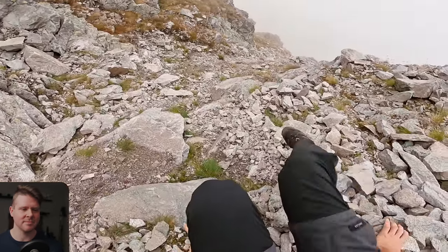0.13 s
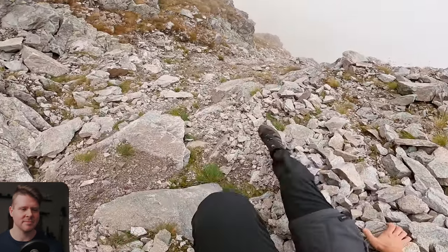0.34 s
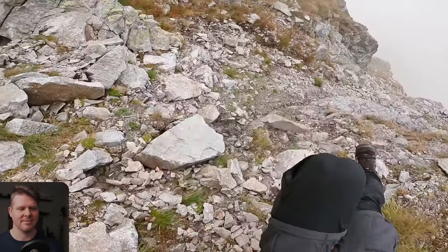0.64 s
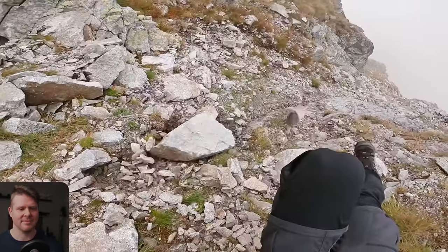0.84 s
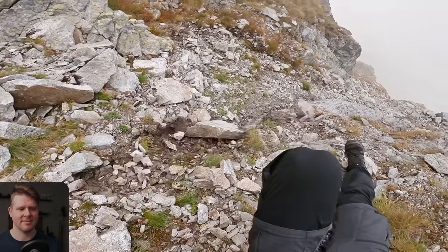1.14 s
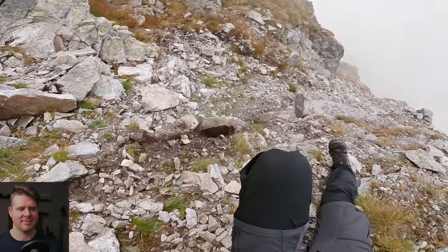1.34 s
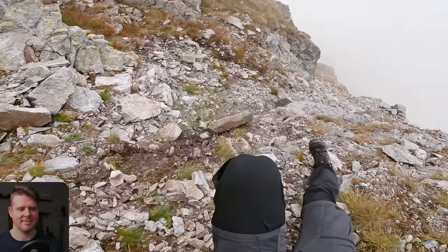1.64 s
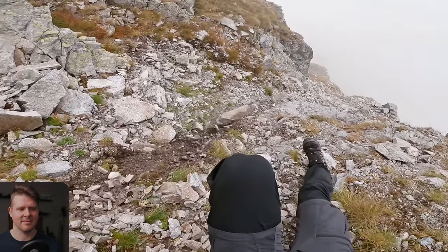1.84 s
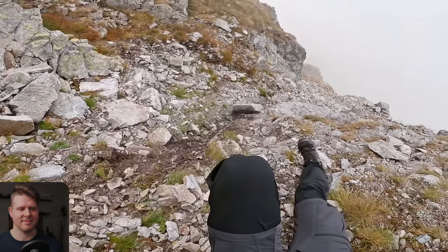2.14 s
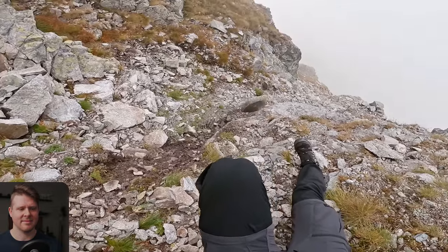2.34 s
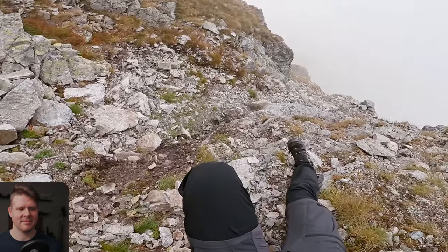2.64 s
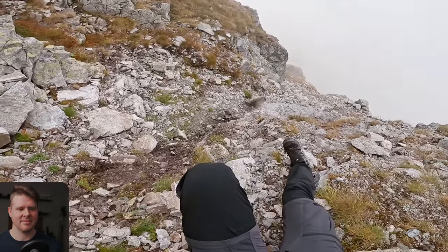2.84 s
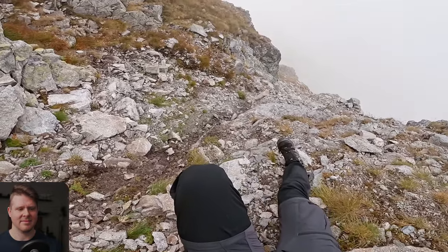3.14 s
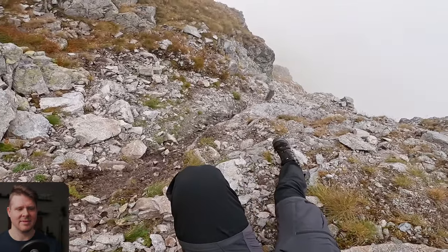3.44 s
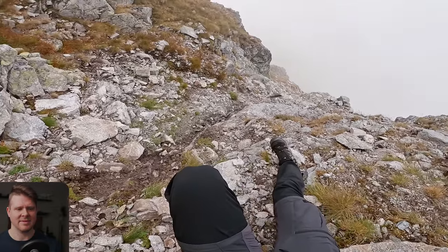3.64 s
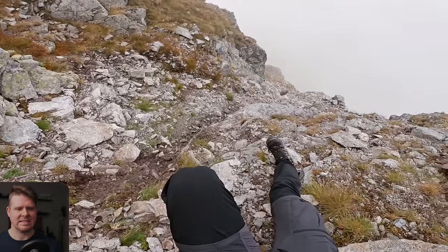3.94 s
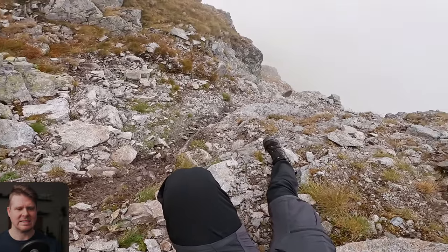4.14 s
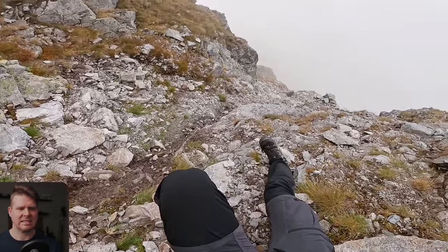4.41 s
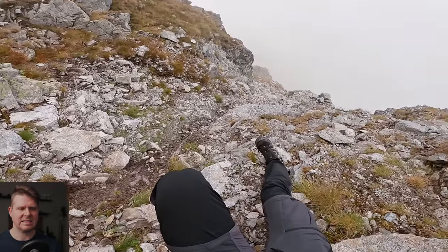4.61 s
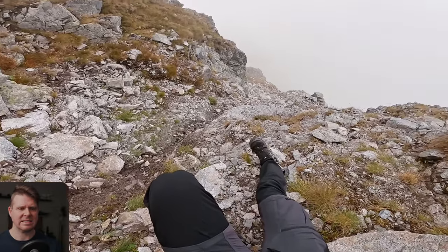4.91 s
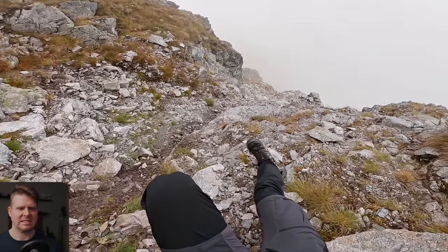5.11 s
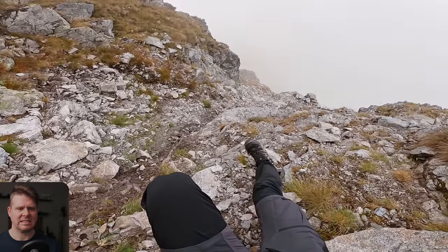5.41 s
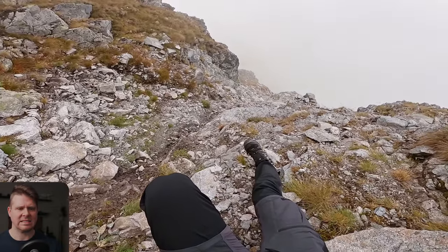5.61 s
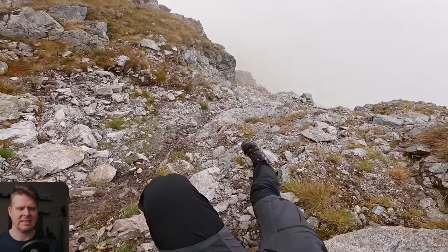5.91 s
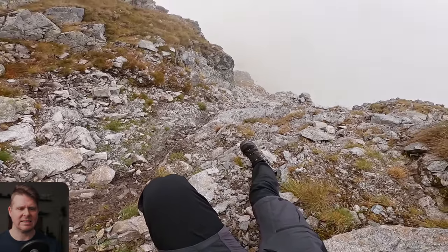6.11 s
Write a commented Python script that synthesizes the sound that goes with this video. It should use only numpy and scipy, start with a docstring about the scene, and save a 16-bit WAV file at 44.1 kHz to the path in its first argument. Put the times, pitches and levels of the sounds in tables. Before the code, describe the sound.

A dry slide of gravel and rocks pours down a mountainside, slabs scraping at first, then stones tumbling, snapping and thumping into soil.

```python
"""Loose stones on a scree slope

Loose stones slide close below a camera worn by a person on the slope, in open air with no echo.
Gravel, chips, tumbling stones and soil are crowds of tiny decaying rings and grit noise, shaped by surges.
Slabs grind in stick-slip rings; flicks, snaps, clacks and thuds are single blows that chatter as they settle.
A low shudder and a faint air rumble lie below; gain control and a fast limiter hold the loud knocks down.
"""
import sys
import numpy as np
from scipy import signal
from scipy.fft import rfft, irfft, next_fast_len
from scipy.io import wavfile
from scipy.ndimage import uniform_filter1d, minimum_filter1d

SR = 44100
rng = np.random.default_rng(int(sys.argv[2]) if len(sys.argv) > 2 else 0)


def int16_out(signal):
    """Quantize to a 16-bit WAV file."""
    q = np.round(np.clip(np.atleast_2d(signal).T, -1, 1) * 32767)
    wavfile.write(sys.argv[1], SR, q.astype(np.int16))


N = 276110
TIME = np.arange(N) / SR  # s

# how far the arrival at the two microphone ports scatters: frequency_hz, lead_scatter_rad
PORT_SCATTER = [(100, .2), (400, .3), (1000, .47), (2000, .6), (4000, .8), (8000, 1.35)]


def amp(db):
    """Decibels to gain."""
    return 10 ** (np.asarray(db) / 20)


def read(points, hz):
    """Reads a frequency table on a logarithmic frequency axis."""
    table_hz, value = np.transpose(points)
    return np.interp(np.log(hz + 1), np.log(table_hz + 1), value)


def add(mix, s, sound):
    """Mixes a sound in at time s."""
    part = mix[:, max(round(s * SR), 0):][:, :sound.shape[1]]
    part += sound[:, :part.shape[1]]


def dulled(x, hz, order):
    """A low-pass: soil and rough faces soften the attack of a blow."""
    return signal.sosfilt(signal.butter(order, hz, fs=SR, output="sos"), x)


def thinned(x, hz, order):
    """A high-pass takes away the bass."""
    return signal.sosfilt(signal.butter(order, hz, "high", fs=SR, output="sos"), x)


def contacts(at, gain, hz, cycles, length, size):
    """Each contact rings for a few cycles and reaches one port sooner, by a random lead."""
    turns = hz.astype(np.float32)[:, None] * np.arange(size, dtype=np.float32) / SR
    push = (gain * np.sign(rng.standard_normal(len(hz))))[:, None]
    lead_rad = read(PORT_SCATTER, hz) * rng.standard_normal(len(hz))
    lead = (lead_rad / (2 * np.pi)).astype(np.float32)[:, None]  # in cycles
    where = ((at * SR).astype(int)[:, None] + np.arange(size)).ravel()
    ports = []
    for side in (1, -1):
        arrived = np.maximum(turns - np.maximum(side * lead, 0), 0)
        attack = np.minimum(2 * arrived, 1)  # half a cycle
        ring = push * np.exp(-arrived / cycles) * attack * np.sin(2 * np.pi * arrived)
        ports.append(np.bincount(where, ring.ravel(), length)[:length])
    return np.array(ports)


def spills(per_s, lo_hz, hi_hz, cycles, spread_db, spill_s, wander, count, size):
    """Stones topple at random, each rattling a few times near its own pitch."""
    toppling = int(per_s * N / SR)
    start, kind, weight = rng.random((toppling, 3)).T[:, :, None]
    at = start * N / SR + spill_s * rng.exponential(1, (toppling, count))
    own_hz = lo_hz * (hi_hz / lo_hz) ** kind
    hz = np.minimum(own_hz * np.exp(wander * rng.standard_normal((toppling, count))), SR / 3)
    scatter = 2 * weight ** 2 + rng.standard_normal((toppling, count)).clip(-2, 2)
    gain = hz * amp(spread_db * scatter)  # higher rings start louder
    stream = contacts(at.ravel(), gain.ravel(), hz.ravel(), cycles, N, size)
    return stream / stream.std()


def grit():
    """Countless crushed grains merge into a hiss; the higher it is, the less alike the two ports hear it."""
    size = next_fast_len(N)
    common, apart = rfft(rng.standard_normal((2, size)))
    alike = np.exp(-read(PORT_SCATTER, np.fft.rfftfreq(size, 1 / SR)) ** 2 / 2)
    side = np.array([[1], [-1]])
    both = common * np.sqrt((1 + alike) / 2) + side * apart * np.sqrt((1 - alike) / 2)
    return irfft(both, size)[:, :N]


def ticks():
    """Sharp edges crumble in short bursts of dry ticks, each too brief to hold a note."""
    return spills(per_s=150, lo_hz=5000, hi_hz=9000, cycles=.35, spread_db=2.3,
                  spill_s=.0015, wander=.1, count=9, size=24)


def jerks(per_s, swing_db, fall_s):
    """The heap slips in jerks: a sudden rise in level that dies away, bounded by the swing."""
    kicks = (rng.random(N) < per_s / SR) * rng.uniform(0.1, 1, N)
    push = signal.lfilter([1], [1, -np.exp(-1 / (fall_s * SR))], kicks)
    return amp(swing_db * np.tanh((push - push.mean()) / push.std() / 2))


def coloured(x, spectrum, band, steady_s):
    """Filters a stream by a spectrum and evens its level in a band (Hz) over spans longer than steady_s."""
    size = next_fast_len(N + 4096)
    hz = np.fft.rfftfreq(size, 1 / SR)
    z = rfft(x, size) * amp(read(spectrum, hz))
    inside = irfft(z.mean(0) * (hz > band[0]) * (hz < band[1]), size)[:N]
    span = max(int(steady_s * SR), 2)
    power = uniform_filter1d(uniform_filter1d(inside ** 2, span), span)
    floor = 0.0067 * power.mean()  # keeps near-silent spots from being blown up
    return irfft(z, size)[:, :N] / np.sqrt(abs(power) + floor)


def flow(surges, steady_db, share, waver_db, waver_s):
    """Gain of one layer: a wavering trickle that follows the slide by a share, with its surges on top."""
    # how hard the slope runs: time_s, relative_level_db
    slide_level = [(0.0, -2), (0.44, -3.5), (0.52, -2), (0.87, -0.5), (1.5, 0.5), (2.68, 0.5), (2.75, 0),
                   (2.92, 0.5), (3.02, 0.5), (3.3, -0.1), (3.74, .5), (3.8, -0.5), (4.15, 0.07), (4.6, 0),
                   (5.8, 0), (6.05, -1), (6.26, -2)]
    # loose ground gives way quickly, runs for a while and jams again
    rise_s, fall_s = 0.0048, 0.0059
    slide = amp(np.interp(TIME, *np.transpose(slide_level)))
    power = (amp(steady_db) * slide ** share) ** 2
    for start, length, db in surges:
        first = int(start * SR)
        age = TIME[:N - first][:SR]
        rise = np.minimum(age / rise_s, 1)
        fall = np.exp(-np.maximum(age - length, 0) / fall_s)
        power[first:first + len(age)] += (amp(db) * rise * fall) ** 2
    span = max(int(waver_s * SR), 2)
    waver = uniform_filter1d(uniform_filter1d(rng.standard_normal(N), span), span)
    return np.sqrt(power) * amp(waver_db * waver / waver.std())


def blows(rows, cycles, chatter_db, pitch_spread, count, size):
    """A stone strikes, then chatters more softly as it settles, each contact at another pitch."""
    out = np.zeros((2, N))
    for s, db, hz, settle_s in rows:
        delay = np.r_[0, rng.exponential(1, count)]  # in settling times
        gain = np.r_[1, amp(chatter_db) * np.exp(-delay[1:] / 2)]
        scatter = np.r_[0, rng.standard_normal(count)]
        pitch = np.minimum(hz * np.exp(pitch_spread * scatter), SR / 3)
        blow = contacts(delay * settle_s, gain, pitch, cycles, SR // 5, size)
        add(out, s, amp(db) * blow / abs(blow).max())
    return out


def air():
    """A faint, even rumble of moving mountain air, which also brushes each port on its own."""
    # rumble filter: frequency_hz, relative_level_db
    rumble = [(15, -6), (40, -3), (80, 0), (130, -3), (300, -18), (1000, -50)]
    brush = dulled(rng.standard_normal((2, N)), hz=45, order=1)
    return amp(-60) * coloured(grit() + .7 * brush, rumble, band=(25, 130), steady_s=.3)


def ground():
    """Low-filtered noise: the slope shudders briefly under heavy blocks, over a far fainter rumble."""
    # shudders: start_s, length_s, relative_level_db
    shudders = [(0.96, 0.086, -46), (1.228, 0.024, -40), (1.672, 0.014, -38), (2.255, 0.059, -40),
                (2.8, 0.064, -42), (2.94, .025, -39), (3.99, 0.025, -38.5), (4.294, 0.021, -33),
                (4.485, 0.016, -33), (5.16, 0.026, -32), (5.203, .055, -31), (5.29, 0.063, -40),
                (6.05, 0.064, -37)]
    # filter of the shaking slope: frequency_hz, relative_level_db
    spectrum = [(20, -15), (45, -5.5), (75, 7.5), (125, 6), (180, -18), (400, -54)]
    level = flow(shudders, steady_db=-60.5, share=0.7, waver_db=1.2, waver_s=0.018)
    return level * coloured(grit(), spectrum, band=(40, 140), steady_s=0.018)


def earth(slip, dry_ticks):
    """Soil slumps under the stones: dull bumps, crumbling ticks and grit through a low filter."""
    # slumps of soil: start_s, length_s, relative_level_db
    slumps = [(0.96, 0.13, -37.5), (1.28, 0.11, -36.5), (2.39, 0.15, -37), (3.0, .09, -34),
              (3.18, 0.25, -38.5), (3.55, 0.15, -36.5), (3.81, 0.27, -41), (4.33, .1, -38.5),
              (4.82, 0.227, -35.5), (5.17, 0.12, -34.5), (5.47, 0.26, -38.5), (6.01, .19, -34)]
    # filter of the soil: frequency_hz, relative_level_db
    spectrum = [(20, -34), (50, -26), (75, -14), (120, -9), (170, -2), (340, 0), (460, -2), (700, -2),
                (1100, -13), (2500, -45)]
    bumps = spills(per_s=70, lo_hz=76.7, hi_hz=836, cycles=2.75, spread_db=2.0,
                   spill_s=.008, wander=0.19, count=3, size=1800)
    stream = (.8 * bumps + 2.5 * dry_ticks + 2.2 * grit()) * slip
    level = flow(slumps, steady_db=-43.5, share=0.99, waver_db=1.5, waver_s=0.033)
    return level * coloured(stream, spectrum, band=(200, 750), steady_s=0.081)


def stones(slip, dry_ticks):
    """Hand-sized stones tumble over each other; short, damped rings give a dry, hollow rattle."""
    # tumbles: start_s, length_s, relative_level_db
    tumbles = [(0.0, 0.21, -26), (0.55, 0.12, -25.5), (0.93, 0.14, -24.5), (1.21, 0.2, -25),
               (1.6, 0.086, -22), (1.84, 0.087, -23), (2.36, 0.27, -25.5), (3.18, 0.12, -25),
               (3.55, 0.12, -23.5), (3.86, 0.18, -22.5), (4.13, 0.28, -25), (4.34, 0.26, -30.5),
               (4.76, 0.25, -29), (5.17, 0.12, -25), (5.37, 0.22, -44), (5.63, 0.11, -28), (6.0, 0.22, -25)]
    # filter of hand-sized stones: frequency_hz, relative_level_db
    spectrum = [(80, -49), (300, -15.5), (600, -9.5), (780, -7), (950, 0), (1300, 0), (1800, -2),
                (2400, -4), (3500, -4.5), (7000, -83)]
    rattle = spills(per_s=190, lo_hz=850, hi_hz=2300, cycles=1.8, spread_db=3.0,
                    spill_s=.004, wander=.22, count=3, size=400)
    stream = (rattle + 2.0 * dry_ticks + 1.4 * grit()) * slip
    level = flow(tumbles, steady_db=-26.0, share=0.43, waver_db=2.0, waver_s=0.043)
    return level * coloured(stream, spectrum, band=(900, 2400), steady_s=0.012)


def gravel(slip, dry_ticks):
    """Pebbles clatter, some rock to rest on their own note, flat ones clink; fine chips tinkle in grit."""
    # gravel pouring away: start_s, length_s, relative_level_db
    pours = [(0.0, 0.15, -24), (0.2, 0.18, -34), (0.525, 0.053, -21), (0.95, 0.13, -27), (1.21, 0.075, -24),
             (1.42, 0.14, -28), (1.61, 0.11, -28), (1.82, 0.075, -23.5), (1.95, 0.025, -22),
             (2.335, 0.05, -23), (2.425, 0.11, -26.5), (2.57, 0.086, -30), (2.66, 0.036, -23),
             (2.81, 0.051, -21.5), (2.985, 0.2, -24), (3.43, 0.062, -20.5), (3.54, 0.15, -22.5),
             (3.84, 0.12, -21.5), (4.01, 0.063, -23.5), (4.13, 0.1, -22.5), (4.38, .06, -27),
             (4.55, .16, -19), (4.755, 0.14, -20.5), (5.17, 0.067, -33), (5.3, 0.12, -33),
             (5.41, 0.05, -20.5), (5.62, 0.1, -26.5), (5.765, 0.04, -22.5), (5.96, 0.13, -31),
             (6.158, 0.12, -26)]
    # sprays of fine chips: start_s, length_s, relative_level_db
    sprays = [(0.52, 0.18, -38), (0.925, 0.1, -35.5), (1.09, 0.076, -35), (1.45, 0.075, -33),
              (1.62, 0.19, -32), (1.9, 0.12, -32.5), (2.07, 0.042, -37), (2.2, 0.26, -50),
              (2.53, 0.12, -37), (3.53, .06, -40), (3.69, 0.049, -37), (4.005, 0.034, -39),
              (4.375, 0.076, -39), (4.68, 0.21, -43), (4.96, 0.057, -49)]
    # filters of gravel and of chips: frequency_hz, relative_level_db
    gravel_spectrum = [(200, -55), (900, -30), (1700, -3), (2400, -1), (3400, 1), (4200, -1), (5200, -4),
                       (6200, -12), (7200, -17), (9000, -21.5), (14000, -49)]
    chip_spectrum = [(500, -19), (3500, 4.5), (5500, 5), (6500, 1), (8000, -7.5), (10000, -17.5),
                     (12400, -24.5), (14800, -42)]
    pebbles = spills(per_s=170, lo_hz=1900, hi_hz=6500, cycles=4, spread_db=2.8,
                     spill_s=.002, wander=.17, count=6, size=360)
    rocking = spills(per_s=55, lo_hz=2000, hi_hz=6500, cycles=7, spread_db=2.2,
                     spill_s=.007, wander=.045, count=10, size=600)
    clinks = spills(per_s=60, lo_hz=2400, hi_hz=6500, cycles=22, spread_db=2.8,
                    spill_s=.006, wander=.02, count=3, size=1400)
    chips = spills(per_s=90, lo_hz=6000, hi_hz=12000, cycles=14, spread_db=2.6,
                   spill_s=.004, wander=.04, count=4, size=400)
    coarse = (1.1 * pebbles + .7 * rocking + .55 * clinks + 1.05 * dry_ticks + .65 * grit()) * slip
    fine = (.4 * chips + .2 * dry_ticks + grit()) * slip ** .8
    pour = flow(pours, steady_db=-26.0, share=0.87, waver_db=0.5, waver_s=0.011)
    spray = flow(sprays, steady_db=-35.0, share=4.24, waver_db=1.8, waver_s=0.024)
    lurch = slip ** .22  # some of the jerking that the levelling evens out
    pouring = pour * lurch * coloured(coarse, gravel_spectrum, band=(2500, 7000), steady_s=0.01)
    spraying = spray * coloured(fine, chip_spectrum, band=(6500, 12000), steady_s=0.028)
    return pouring + spraying


def scrapes():
    """A slab sticks and slips unevenly; each slip rings near one note, with a brighter rasp of grains."""
    # slabs scraping and pebbles skidding over rock:
    # start_s, end_s, relative_level_db, pitch_hz, slips_per_s, pitch_scatter (natural-log share)
    grinds = [(0.0, 0.165, -18.2, 2150, 190, 0.26), (0.154, 0.38, -18.5, 1790, 150, 0.15),
              (0.387, 0.501, -26, 1610, 150, .2), (1.33, 1.406, -22, 1340, 200, 0.22),
              (3.069, 3.122, -26, 3020, 220, .06), (3.578, 3.625, -21, 3000, 260, 0.063),
              (5.309, 5.327, -24, 4960, 250, 0.083), (5.49, 5.535, -18.5, 3400, 260, 0.12),
              (5.992, 6.134, -19.5, 1400, 200, 0.26)]
    slip_s, cycles, count = .0015, 2.0, 9  # spread of a slip, decay in cycles, contacts per slip
    out = np.zeros((2, N))
    for start, end, db, hz, slips_per_s, pitch_spread in grinds:
        span = max(end - start, .02)
        slips = int(span * slips_per_s) + 2
        place = (np.arange(slips)[:, None] + rng.uniform(.2, .8, (slips, 1))) / slips
        at = place * span + slip_s * rng.exponential(1, (slips, count))
        gain = np.sin(np.pi * place) ** 0.37 * amp(0.1 * rng.standard_normal(at.shape))
        pitch = hz * np.exp(pitch_spread * rng.standard_normal(at.size))
        length = int(span * SR) + SR // 50
        note = contacts(at.ravel(), gain.ravel(), pitch, cycles, length, size=700)
        rasp = contacts(at.ravel(), gain.ravel(), 1.68 * pitch, cycles / 2, length, size=700)
        grind = note + amp(-3.0) * dulled(rasp, hz=5400, order=4)
        grind = thinned(grind, hz=950, order=4)  # a thin slab radiates no bass
        add(out, start, amp(db) * grind / grind.std())
    return out


def running():
    """Gain of the running stone: the heap catches for an instant, drops in level and picks up again."""
    # moments when the heap jams: start_s, length_s
    jams = [(0.188, .006), (0.382, 0.013), (0.46, 0.012), (0.665, 0.013), (1.915, 0.01), (2.324, 0.014),
            (2.642, 0.0093), (2.888, 0.0086), (2.73, 0.016), (4.097, 0.019), (5.012, .012), (5.264, 0.016),
            (5.912, 0.015), (5.947, 0.014)]
    jam_db, edge_s = -5, .002
    held = np.zeros(N)
    for start, length in jams:
        inside_s = np.minimum(TIME - start, start + length - TIME)
        held += np.clip(inside_s / edge_s + .5, 0, 1)
    return amp(jam_db * held)


def flicks():
    """A splinter hits rock with a short, bright tick and skips as it settles."""
    # splinters against rock: start_s, relative_level_db, pitch_hz
    splinters = [(0.64, -13, 7400), (1.117, -9, 7400), (2.108, -12, 7500), (2.774, -16, 7900),
                 (3.328, -8, 7150), (4.029, -25, 10000), (4.403, -15, 7460), (5.13, -9, 6700),
                 (5.942, -9, 6170)]
    settle_s = .0012
    rows = [(s, db, hz, settle_s) for s, db, hz in splinters]
    return blows(rows, cycles=6.0, chatter_db=-14, pitch_spread=0.2, count=5, size=200)


def snaps():
    """Small stones snap against rock: a strongly damped crack with a softer, longer ring."""
    # small stones striking: start_s, relative_level_db, pitch_hz, settling_time_s
    strikes = [(0.003, -1, 2280, 0.0054), (0.032, -2, 4220, 0.0022), (0.097, 8, 2930, 0.0052),
               (0.149, -1, 2900, 0.0047), (0.235, 2, 2730, 0.0019), (0.344, -2, 3020, 0.0033),
               (0.39, 6, 2580, 0.0019), (0.638, -2, 3370, 0.0058), (1.762, 10, 3960, 0.0016),
               (1.791, 9, 3300, 0.0018), (1.818, -8, 2730, 0.0036), (2.705, -6, 3830, 0.0024),
               (3.22, -12, 2180, 0.0013), (3.345, 0, 2680, 0.0025), (3.353, 6, 3650, 0.0043),
               (3.755, 1, 3700, 0.0078), (4.096, 0, 5200, 0.0028), (4.144, -9, 3800, 0.0028),
               (4.32, 6, 2870, 0.0025), (4.504, 1, 3950, 0.0044), (4.638, -3, 2720, 0.0032),
               (4.887, 0, 2330, 0.0034), (4.963, -3, 4640, .0015), (5.048, -3, 2900, 0.007),
               (5.254, -1, 3700, 0.0032), (5.291, -5, 2900, 0.0037), (5.439, -6, 3900, 0.0036),
               (5.474, -4, 3240, 0.0013), (5.658, 1, 2720, 0.0059), (5.824, 10, 3750, 0.0013),
               (5.917, -10, 3840, 0.00057), (5.929, -9, 3420, 0.0023), (5.959, 0, 3800, 0.00066),
               (5.984, -6, 4960, .0015), (6.121, 0, 3940, 0.0026), (6.159, -2, 3500, 0.0045),
               (6.178, -1, 3600, 0.0045), (6.226, -4, 3050, 0.0036)]
    cracks = blows(strikes, cycles=2.1, chatter_db=-4, pitch_spread=0.25, count=10, size=240)
    rings = blows(strikes, cycles=10, chatter_db=-4, pitch_spread=.03, count=3, size=900)
    return dulled(amp(-5.5) * cracks + amp(-12.0) * rings, hz=6860, order=4)


def clacks():
    """Large stones meet with a hard knock and ring briefly with a hollow note."""
    # large stones knocking together: start_s, relative_level_db, pitch_hz, settling_time_s
    meetings = [(0.024, -6, 1540, 0.0021), (0.048, -6, 1400, 0.0015), (0.066, -8, 1360, 0.0024),
                (0.163, -1, 1880, 0.0026), (0.175, -4, 1420, 0.0054), (0.223, -4, 1610, 0.0053),
                (0.235, 2, 1430, 0.0019), (0.296, -3, 1900, 0.00071), (0.404, -6.5, 1770, 0.0012),
                (0.418, -12, 1650, 0.0005), (0.435, -12, 1700, 0.0053), (0.488, -8, 1490, 0.005),
                (0.623, -14, 1180, 0.0045), (0.769, -15, 1110, 0.0038), (0.796, -4.5, 1220, 0.0097),
                (0.9, -8, 2120, .003), (0.926, -5, 1700, 0.011), (1.109, -7.5, 1170, 0.0043),
                (1.302, -5, 1280, 0.0033), (1.356, -2, 1370, 0.01), (1.378, -7.5, 1110, 0.0096),
                (1.844, -7, 1020, 0.0036), (2.177, -9, 1120, 0.0073), (2.256, -11, 1110, 0.0019),
                (2.29, -12, 960, 0.0072), (2.685, -7.5, 1010, 0.011), (2.795, -9, 1000, 0.008),
                (2.806, -7, 1020, 0.006), (2.823, -7, 980, 0.0087), (2.935, 3, 1040, 0.00323),
                (2.948, -2, 997, 0.014), (3.148, -8, 1130, 0.0044), (3.203, -8, 1086, 0.0085),
                (3.281, -9, 1045, .004), (3.289, -3, 1120, 0.0049), (3.331, -8, 1060, 0.0042),
                (3.405, -6.5, 1100, 0.013), (3.431, -12, 1080, 0.0049), (3.777, -8, 1070, 0.012),
                (3.975, -3, 1230, 0.011), (4.129, -6, 1330, 0.005), (4.29, -9, 940, 0.0071),
                (4.534, -8.5, 950, 0.014), (4.907, -9, 1050, 0.0026), (4.92, -9.5, 1030, 0.0033),
                (4.987, -11, 920, 0.0021), (5.012, -11, 1110, 0.0039), (5.153, -1, 1070, 0.0046),
                (5.215, -6, 900, 0.013), (5.269, -6, 1410, 0.0041), (5.463, -7, 1140, 0.0022),
                (5.563, -11, 975, 0.011), (5.69, -3, 1220, 0.014), (5.8, -8.5, 1030, 0.0034),
                (6.053, 1, 1340, 0.009), (6.078, -4, 1220, 0.0059)]
    knock = blows(meetings, cycles=1.4, chatter_db=-6.5, pitch_spread=0.16, count=6, size=700)
    ring = blows(meetings, cycles=6, chatter_db=-4, pitch_spread=.05, count=3, size=1400)
    return dulled(knock + amp(-7.5) * ring, hz=4970, order=2)


def thuds(dry_ticks):
    """A block pushes into the ground with low rings and crushes the soil beneath it until it settles."""
    # blocks landing on earth: start_s, relative_level_db, pitch_hz, settling_time_s
    landings = [(0.622, -22.5, 330, 0.016), (0.769, -17, 382, 0.018), (0.814, -27, 278, 0.017),
                (0.975, -25, 302, 0.039), (1.228, -22, 262, 0.012), (1.356, -18, 305, 0.029),
                (1.481, -17.5, 453, 0.025), (1.52, -19, 314, 0.015), (1.676, -20, 347, 0.018),
                (1.842, -22, 370, 0.03), (1.913, -18, 338, 0.028), (2.047, -10.5, 244, 0.0067),
                (2.068, -13.5, 280, 0.019), (2.252, -18.5, 332, 0.014), (2.287, -18, 207, 0.019),
                (2.685, -8.5, 300, 0.012), (2.793, -10.5, 343, 0.017), (2.804, -12.5, 175, 0.024),
                (2.931, -12, 290, 0.0128), (2.947, -12.5, 167, 0.017), (3.777, -17, 290, 0.029),
                (3.978, -21, 246, 0.021), (4.291, -14, 396, 0.018), (4.489, -11.5, 239, 0.01),
                (4.532, -19, 352, 0.039), (4.771, -21.5, 365, 0.022), (4.829, -24, 400, 0.0083),
                (4.879, -21.5, 400, 0.011), (4.955, -23, 380, 0.014), (5.083, -18, 380, 0.0064),
                (5.155, -22, 400, .018), (5.196, -20, 257, 0.034), (5.422, -17.5, 248, 0.012),
                (5.465, -21, 340, .013), (5.564, -20.5, 430, 0.023), (5.798, -20, 423, 0.012)]
    # filter of the crushed soil: frequency_hz, relative_level_db
    spectrum = [(25, -27), (50, -21), (75, -15), (120, -1), (160, 12), (220, 5), (340, 11), (520, 9),
                (750, 4), (1100, -2), (2000, -12), (4000, -45)]
    age = np.arange(SR // 4) / SR
    pressure = np.zeros((1, N))
    for s, db, hz, settle_s in landings:
        press = (1 - np.exp(-age / .002)) * np.exp(-age / settle_s)
        add(pressure, s, amp(db) * press[None])
    crush = pressure * coloured(grit() + dry_ticks, spectrum, band=(100, 1300), steady_s=0.0091)
    push = blows(landings, cycles=1.6, chatter_db=-7, pitch_spread=.24, count=4, size=2400)
    push = thinned(push, hz=110, order=2)  # loose soil takes up the deepest part
    return amp(-3.6) * dulled(push, hz=1000, order=2) + amp(-6.8) * crush


def scene():
    """Gravel, stones and soil share jerks and ticks; jams hold all sliding, and single blows stand out."""
    slip = jerks(per_s=70, swing_db=5.8, fall_s=.008)
    dry_ticks = ticks()
    # the knocking stones are too small to radiate bass
    knocks = thinned(clacks() + snaps() + flicks(), hz=520, order=2)
    slide = gravel(slip, dry_ticks) + stones(slip, dry_ticks) + earth(slip, dry_ticks) + scrapes()
    return running() * slide + thuds(dry_ticks) + ground() + knocks + air()


def squeezed(x):
    """Gain control: smoothed power above a threshold turns the whole mix down by a share of the excess."""
    threshold_db, share, reaction_s = -21.5, 0.27, 0.011
    keep = np.exp(-1 / (reaction_s * SR))
    power = signal.lfilter([1 - keep], [1, -keep], (x ** 2).mean(0))
    over_db = np.maximum(10 * np.log10(power + 1e-12) - threshold_db, 0)
    return x * amp(-share * over_db)


def limited(x):
    """A fast limiter ducks both ports just ahead of a peak, then lets the gain climb back."""
    limit_db, recovery_db_per_s = -5.8, 600
    over_db = np.maximum(20 * np.log10(abs(x).max(0) + 1e-9) - limit_db, 0)
    recovery_db = recovery_db_per_s * TIME
    held_db = np.maximum.accumulate(over_db + recovery_db) - recovery_db
    return x * uniform_filter1d(minimum_filter1d(amp(-held_db), size=31), size=31)


def record(dry):
    """The camera body shades and delays one port; gain control, a fast limiter and the band limit follow."""
    # phase between the microphone ports: frequency_hz, lead_of_left_rad
    port_lead = [(100, 0), (250, -.08), (500, -.25), (1000, -.52), (2000, -.66), (6200, -.85), (7700, -2.4),
                 (9500, -1.5), (14000, -1.3)]
    # level between the microphone ports: frequency_hz, left_minus_right_db
    port_balance = [(100, .2), (1200, .6), (2400, -.2), (5500, -.7), (7200, -6), (9000, -4.5), (14000, -2)]
    edge_hz = 15200
    size = next_fast_len(N + 4096)
    hz = np.fft.rfftfreq(size, 1 / SR)
    side = np.array([[.5], [-.5]])  # half of each difference goes to each port
    ports = amp(side * read(port_balance, hz)) * np.exp(1j * side * read(port_lead, hz))
    at_ports = irfft(rfft(dry, size) * ports, size)[:, :N]
    heard = limited(amp(-0.5) * squeezed(at_ports))
    band_limit = signal.firwin(511, edge_hz, window=("kaiser", 9), fs=SR)
    return signal.oaconvolve(heard, band_limit[None], "same")


dry = scene()
out = record(dry)
int16_out(out)
```